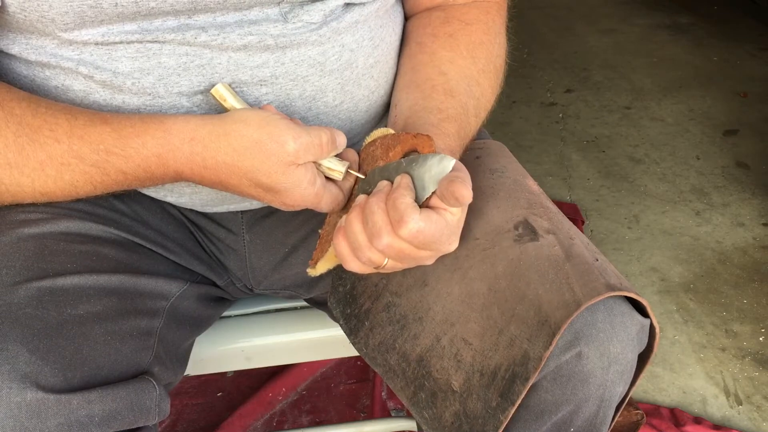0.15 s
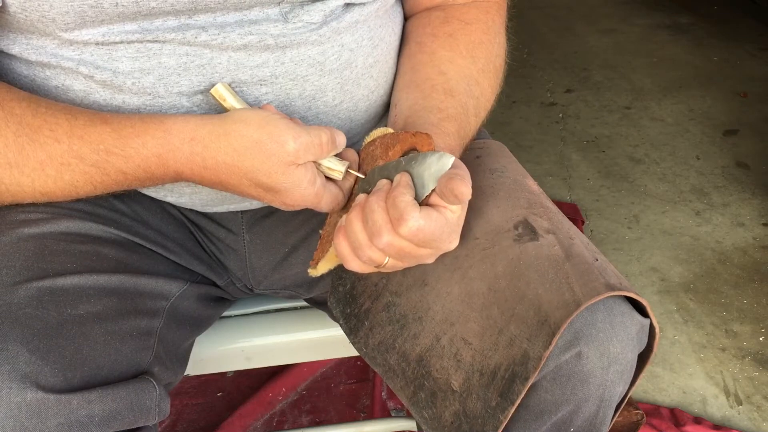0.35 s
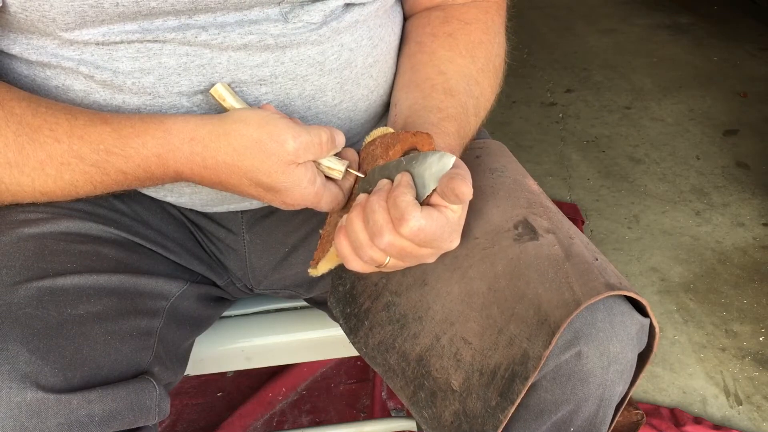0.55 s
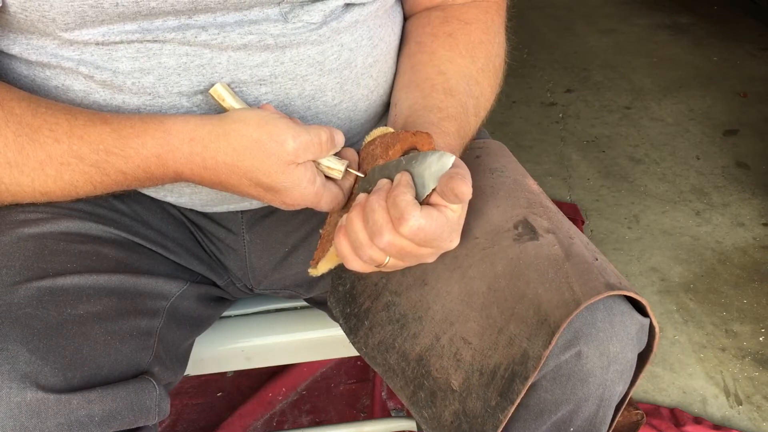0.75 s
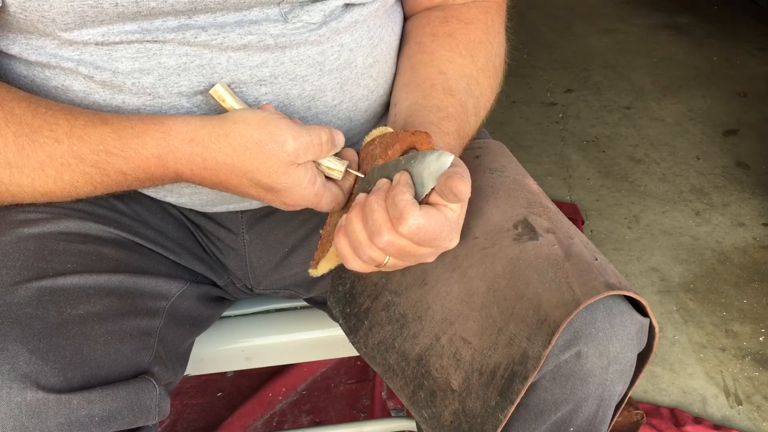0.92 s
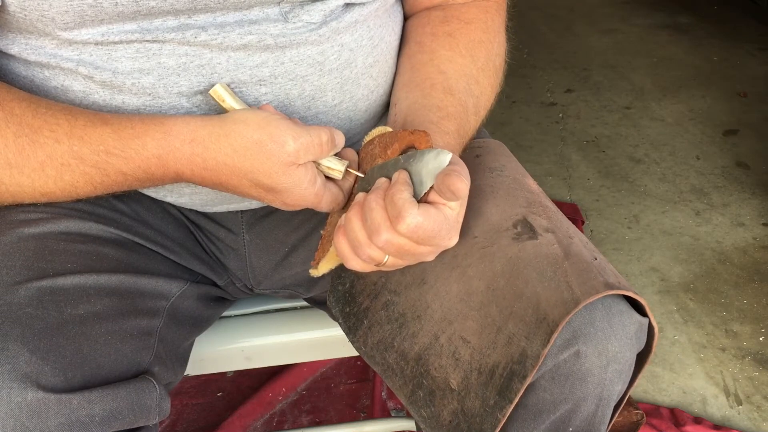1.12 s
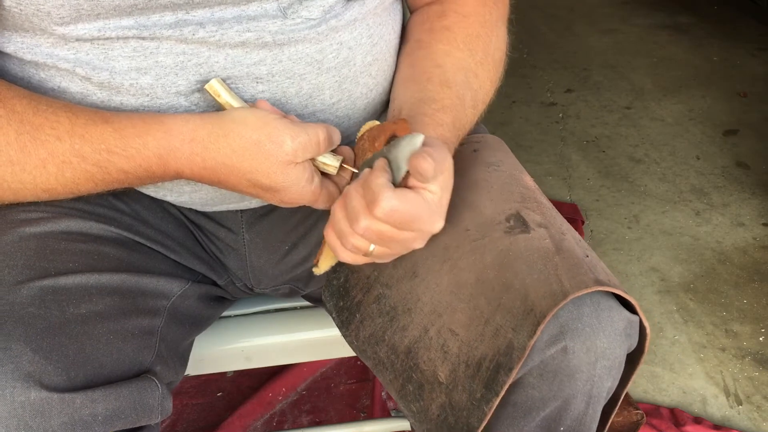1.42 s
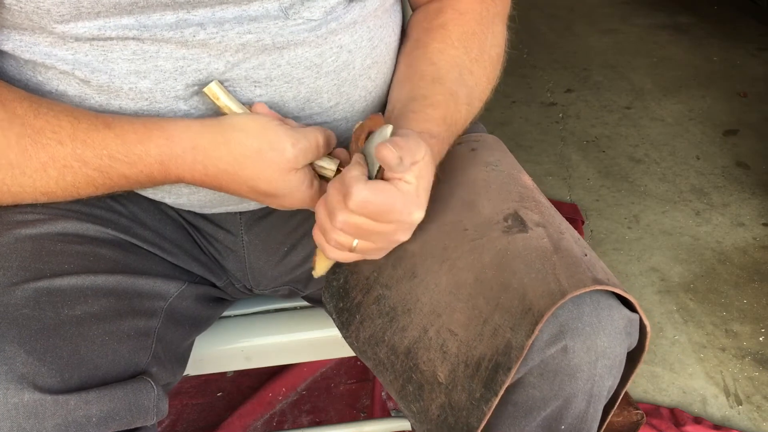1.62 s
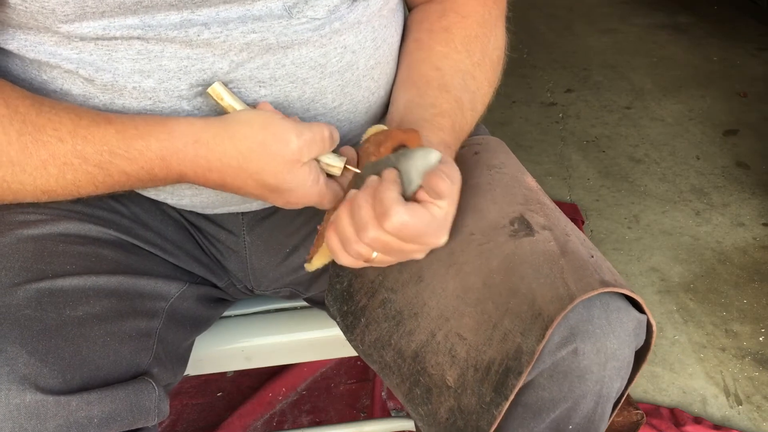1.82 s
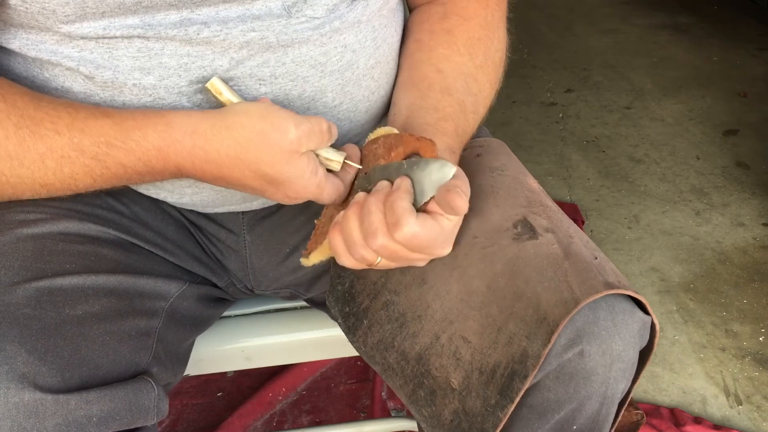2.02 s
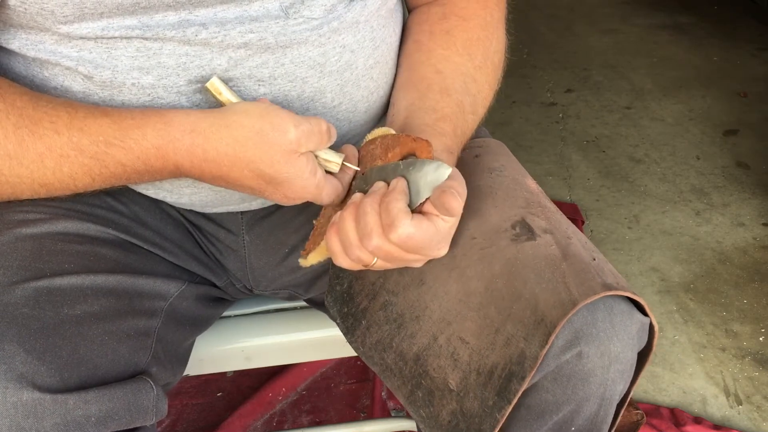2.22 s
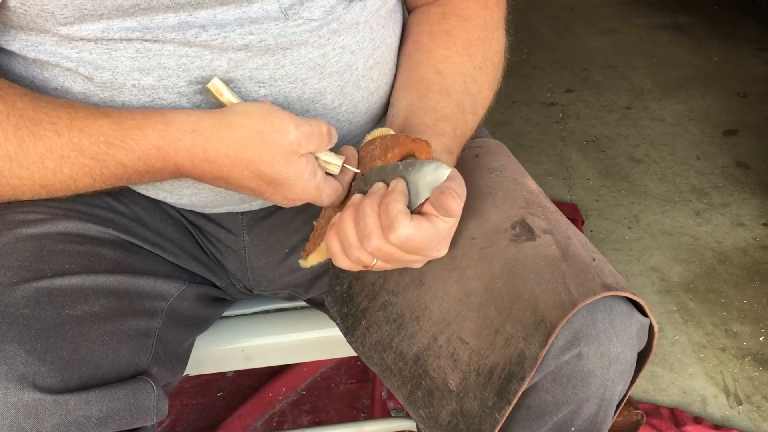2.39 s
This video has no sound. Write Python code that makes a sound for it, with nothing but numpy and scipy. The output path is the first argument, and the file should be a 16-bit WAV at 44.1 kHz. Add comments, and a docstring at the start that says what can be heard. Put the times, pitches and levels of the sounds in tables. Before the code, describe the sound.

Flakes snap off a hand-held stone as a tool presses its edge, close to the microphone. Light ticks build to two crisp cracks, followed by quick smaller ones and a faint leather rub, over low machine hum indoors.

```python
"""Pressure flaking in a workshop. Over a low machine hum, a pointed tool bites the edge of a stone held
in a leather pad. From 0.5 s the edge ticks under the load, with one faint scrape. Flakes snap off with
sharp cracks, loudest at 1.38 and 1.56 s; the hand damps the stone at once and the room answers briefly.
A flurry of smaller cracks follows, the tip scrapes over crumbs at 1.82 s, and the leather rubs softly
as the grip settles."""
import sys
import numpy as np
from scipy import signal
from scipy.fft import rfft, irfft, next_fast_len
from scipy.io import wavfile
from scipy.ndimage import map_coordinates

SR = 44100
rng = np.random.default_rng(int(sys.argv[2]) if len(sys.argv) > 2 else 0)


def generate_wav(sig):
    """Save sig (samples, or channels by samples) to the path in sys.argv[1] as 16-bit PCM at SR."""
    pcm = np.round(np.clip(np.atleast_2d(sig).T, -1, 1) * 32767).astype(np.int16)
    wavfile.write(sys.argv[1], SR, pcm)


N = 112455  # 2.55 s


def amp(db):
    """Decibels to gain."""
    return 10 ** (np.asarray(db) / 20)


def unit(x):
    """Scale to rms 1."""
    return x / np.sqrt(np.mean(x ** 2) + 1e-20)


def along(curve, hz):
    """Read a curve of (frequency, value) points on a log frequency axis."""
    freqs, values = np.transpose(curve)
    return np.interp(np.log(hz + 1), np.log(freqs + 1), values)


def below(hz, edge_hz, order):
    """Low-pass shape: 1 well under the edge, 0 well above."""
    return 1 / (1 + (hz / edge_hz) ** order)


def filtered(x, response):
    """Zero-phase filter; response gives the gain at each frequency."""
    size = next_fast_len(len(x) + 4096)
    return irfft(rfft(x, size) * response(np.fft.rfftfreq(size, 1 / SR)), size)[:len(x)]


def equalise(x, curve):
    """Apply an EQ curve in dB."""
    return filtered(x, lambda hz: amp(along(curve, hz)))


def noise(curve):
    """A bed of coloured noise at rms 1."""
    return unit(equalise(rng.standard_normal(N), curve))


def wobble(knots_per_s):
    """A smooth random modulator."""
    position = np.arange(N) * knots_per_s / SR + 2
    return map_coordinates(rng.standard_normal(256), [position], mode="mirror")


def add(track, start_s, sound):
    """Lay a sound into the track."""
    i = round(start_s * SR)
    track[i:i + len(sound)] += sound[:N - i]


# Tones of the machine hum: f/Hz, level/dB
HUM_TONES = [(37, -48.5), (50.8, -46.5), (60, -55), (74, -45.5), (78.7, -54), (97.2, -53), (123.6, -52.5),
             (139, -60), (147, -59.5), (172.5, -65), (394, -68)]
# EQ of the rumble under them: f/Hz, relative level/dB
RUMBLE_EQ = [(20, -31), (32, -13), (45, -5), (62, 3), (90, -3.5), (116, -7), (142, -3.5), (160, -10),
             (172, -8), (230, -12), (290, -20), (600, -42), (1500, -120)]


def machine_hum(drift_rad=0.18, waver_db=1, rumble_db=-45):
    """A machine drones: low tones, each wavering in level and phase, over a rumble."""
    t = np.arange(N) / SR
    hum = np.zeros(N)
    for hz, db in HUM_TONES:
        peak = np.sqrt(2) * amp(db + waver_db * wobble(2.4))
        phase = 2 * np.pi * (hz * t + rng.random()) + drift_rad * wobble(3)
        hum += peak * np.sin(phase)
    return hum + amp(rumble_db) * noise(RUMBLE_EQ)


# EQ of the room's air: f/Hz, relative level/dB
AIR_EQ = [(150, -22), (260, -7), (320, -3.5), (390, -1.5), (500, -6), (650, -3), (1100, -4.5),
          (1600, -10.5), (2100, -12), (2900, -19.5), (3800, -21), (4900, -27), (6200, -26.5), (7700, -33),
          (9000, -32.5), (10300, -39), (11100, -37), (16000, -37)]
# Fader ride on the air, before centring and scaling by ride_depth: t/s, level/dB
AIR_RIDE = [(0.0, -54), (0.46, -56), (0.77, -56), (1.62, -54), (1.89, -55.5), (2.55, -54)]


def room_tone(level_db=-53, ride_depth=.7):
    """The workshop's air: a soft noise bed whose level sways slightly."""
    ride_db = np.interp(np.arange(N) / SR, *np.transpose(AIR_RIDE))
    return amp(level_db + ride_depth * (ride_db - ride_db.mean())) * noise(AIR_EQ)


# Decay of the workshop's reverb tail: f/Hz, T60/s
REVERB_DECAY = [(300, 0.45), (2500, 0.38), (6000, 0.33), (11000, 0.3), (16000, 0.43)]
# EQ on the reverb return: f/Hz, level/dB
REVERB_EQ = [(300, 1), (1500, 2), (3500, 0), (6000, -3.5), (11000, -3.5), (16000, -3.5)]


def in_room(x, tail_db=-15.5, early_db=-11, early_t60_s=.09, predelay_s=.004):
    """The dry sound, quick reflections from body and floor, then the workshop's tail."""
    hz, frame_s, bands = signal.stft(rng.standard_normal(SR // 2), SR, nperseg=256)
    decay = amp(-60 * frame_s / along(REVERB_DECAY, hz)[:, None])
    tail = signal.istft(bands * decay, SR, nperseg=256)[1]
    t = np.arange(len(tail)) / SR
    early = rng.standard_normal(len(t)) * amp(-60 * t / early_t60_s)
    reverb = (amp(tail_db) * unit(tail) + amp(early_db) * unit(early)) / np.sqrt(len(t))
    impulse_response = np.r_[1, np.zeros(round(predelay_s * SR)), equalise(reverb, REVERB_EQ)]
    return signal.fftconvolve(x, impulse_response)


# EQ of the leather rub: f/Hz, relative level/dB
LEATHER_EQ = [(500, -26), (2200, 3.5), (3000, -10), (4200, -4), (5000, -15), (6300, -8), (7700, -19),
              (8900, -9.5), (10200, -28), (11200, -12.5), (15000, -29)]


def leather_rub(peak_s=2.125, rise_s=.37, fall_s=.24, level_db=-64):
    """The pad shifts in the hand as the grip settles: one faint swell of friction noise."""
    t = np.arange(N) / SR - peak_s
    swell = np.exp(-(t / np.where(t < 0, rise_s, fall_s)) ** 2 / 2)
    return amp(level_db) * swell * noise(LEATHER_EQ)


# Cues for the tip's scrapes: t/s, length/s, level/dB
SCRAPE_CUES = [(0.915, 0.043, -63), (1.8202, 0.036, -42)]
# EQ of the stone grit: f/Hz, relative level/dB
GRIT_EQ = [(300, -14), (1500, -7), (2300, 3.5), (3800, -13), (4700, 1.5), (5100, -14), (6200, 6.5),
           (7600, -28), (9800, -7), (13000, -25), (15500, -15)]


def scraping(grains_per_s=1800):
    """The tip drags over crumbs on the edge: short strokes of dense, tiny clicks."""
    track = np.zeros(N)
    t = np.arange(SR // 10) / SR
    for start_s, length_s, db in SCRAPE_CUES:
        grains = rng.standard_normal(len(t)) * (rng.random(len(t)) < grains_per_s / SR)
        grit = unit(equalise(grains, GRIT_EQ))
        stroke = np.sqrt(np.abs(np.sin(np.pi * np.minimum(t / length_s, 1))))
        add(track, start_s, amp(db) * in_room(stroke * grit))
    return track


def fracture(t, length_ms, attack_s=.00012, release_s=.0006):
    """The transient as the stone splits: a near-white noise burst, released after length_ms."""
    since_release = np.maximum(t - length_ms / 1000, 0)
    envelope = (1 - np.exp(-t / attack_s)) * np.exp(-since_release / release_s)
    burst = rng.standard_normal(len(t))
    for _ in range(6):  # shape in time, then flatten the spectrum
        burst = irfft(np.exp(1j * np.angle(rfft(burst * envelope))))
    return burst * np.minimum(1, 10 * envelope)


def ringing(gain):
    """The minimum-phase impulse response with this gain at each frequency."""
    cepstrum = irfft(np.log(gain + 1e-6))
    half = len(cepstrum) // 2
    causal = np.r_[cepstrum[0], 2 * cepstrum[1:half], np.zeros(half)]
    return irfft(np.exp(rfft(causal)))


# Broadband tone of the bare fracture: f/Hz, relative level/dB
SNAP_EQ = [(120, -25), (300, -20.5), (900, -19), (2700, -18), (3700, -11.5), (5500, -17.5), (7300, -12.5),
           (11000, -20), (12300, -21), (15500, -22.5)]
# Modes of the hand-damped stone: f/Hz, half width/Hz, relative level/dB at five places along the edge
STONE_MODES = [(392, 78, -20, -16, -14, -21, -7), (604, 133, -6, -16, -17, -21, -13.5),
               (1090, 180, -2.5, -4.5, -4.5, -6, -5), (1447, 93, -14, -1.5, 0.5, -2, -22.5),
               (1694, 170, -2, -12, -5.5, -10, 0.5), (2230, 210, -0.5, -7, -3, -3, -5.5),
               (2510, 180, -3.5, -4.5, -14, 0, -16), (2870, 110, -24, -22, -17, -9, -2.5),
               (3240, 110, -5.5, 0, -20, 1.5, -1), (4595, 152, -10.5, -4, 0.5, 1, -2),
               (5270, 220, -19.5, 1.5, 1, -5.5, -9), (5690, 186, 1.5, -7, 1, -8, -3),
               (6130, 154, -1, 2, -12, -0.5, 4), (6320, 280, 1, -9, -23, -12, -5.5),
               (7700, 200, -16, -13.5, -6, -8, -8.5), (8900, 175, -8, -8, -5, -2, -16),
               (9860, 220, -8.5, -10, -19, -16, -14), (10580, 200, -12, -7.5, -14, -10.5, -7.5),
               (11020, 190, -3.5, -10.5, -12, -9, -10.5), (13600, 225, -16, -22, -22, -11, -25)]
# Notches between the modes: f/Hz, half width/Hz, level/dB
STONE_NOTCHES = [(3740, 260, -4), (7800, 180, -1.5), (9130, 180, -4.5), (12300, 300, -1)]


def crack(thud_db, bass_db, treble_db, top_db, place, length_ms, makeup_db=15.5):
    """A fracture rings the stone; where the tip presses decides which modes answer."""
    t = np.arange(2048) / SR
    hz = np.fft.rfftfreq(len(t), 1 / SR)
    power = amp(along(SNAP_EQ, hz)) ** 2
    for centre_hz, width_hz, *levels_db in STONE_MODES:
        mode_db = np.interp(place, np.linspace(0, 1, len(levels_db)), levels_db)
        power += (amp(mode_db) / (1 + ((hz - centre_hz) / width_hz) ** 2)) ** 2
    notches_db = sum(db * np.exp(-((hz - centre_hz) / width_hz) ** 2)
                     for centre_hz, width_hz, db in STONE_NOTCHES)
    # two low and two high shelves give each crack its own colour
    shelves_db = (thud_db * below(hz, edge_hz=890, order=6)
                  + bass_db * below(hz, edge_hz=2200, order=4)
                  + treble_db * (1 - below(hz, edge_hz=7460, order=10))
                  + top_db * (1 - below(hz, edge_hz=10000, order=24)))
    stone = ringing(np.sqrt(power) * amp(makeup_db + notches_db + shelves_db))
    return signal.fftconvolve(fracture(t, length_ms), stone)


# Cues where the edge gives way: t/s, relative level/dB, thud/dB, bass/dB, treble/dB, top/dB,
# place along the edge (0-1), fracture length/ms
CRACK_CUES = [(0.5256, -38, -16, -10, 9.5, -7, .28, .8), (0.9335, -30, -3, -11, 3, -0.5, .95, 1.9),
              (0.9416, -35, -3, -10, 1, 1, .9, 0.87), (0.9520, -34.5, 6, -4, 5.5, 2, .25, 0.66),
              (1.1231, -12.5, 3.5, -2.5, 1.5, -7, .25, 2.1), (1.132, -27, 0, -5, 4, -2, .1, 1.6),
              (1.3270, -32.5, 2, -8, 2, -1, .03, 0.56), (1.3391, -29.5, 2, 0, 9, -1, .05, .8),
              (1.3504, -23.5, -7, 4.5, 9, -7, 0, 0.39), (1.3778, 0, -1.5, 0.5, 0, -1, 0.03, 1.7),
              (1.4364, -32, 0, -8, -4, 6, .1, 0.71), (1.5410, -32.5, -13, 9.5, 9, 2, .85, 0.55),
              (1.56, 3, 1.5, -0.5, 0, -0.5, 1, 2.3), (1.6092, -21.5, 0, -7, -1.5, 6, 0.5, 3),
              (1.7010, -30.5, 2, -7, -1, -1, .95, 1.35), (1.7103, -26, -12, 2, -2, -5, .8, 0.94),
              (1.7269, -13.5, -9, 2.5, -7.5, 0, .5, 1.2), (1.7336, -37, -7.5, 17, -8, 0, .5, 1.55),
              (1.739, -31, 2, 10, -8, -2, .5, 0.77), (1.7580, -20, 2, -1, -1, 0, .75, 2.4),
              (1.7686, -19, -3, 1, 3.5, -5, .38, 1.65), (1.779, -25, -5, -8, -1, 4, 1, .8),
              (1.784, -26, 4, 2, 5, 0, .1, 1), (1.787, -7.5, -4, -2, -1, -2, .75, 1.4),
              (1.7961, -24, -9, 8, -3, -2, .65, 1.6), (1.8472, -21, -6, -1.5, -4.5, 0, .2, 4.5)]


def flaking():
    """Small ticks as the load builds, loud cracks as flakes let go."""
    track = np.zeros(N)
    for start_s, db, *character in CRACK_CUES:
        add(track, start_s, amp(db) * in_room(crack(*character)))
    return track


def scene():
    """A close mono mix: the handwork up front, the workshop bed behind."""
    return (flaking() + scraping() + leather_rub() + machine_hum() + room_tone())[None]


def record(dry):
    """A steep high cut on the master."""
    return np.array([filtered(x, lambda hz: below(hz, edge_hz=15900, order=120)) for x in dry])


dry = scene()
out = record(dry)
generate_wav(out)
```